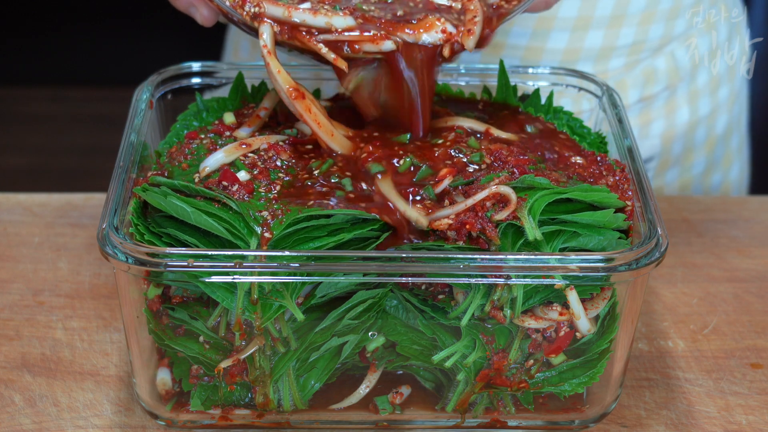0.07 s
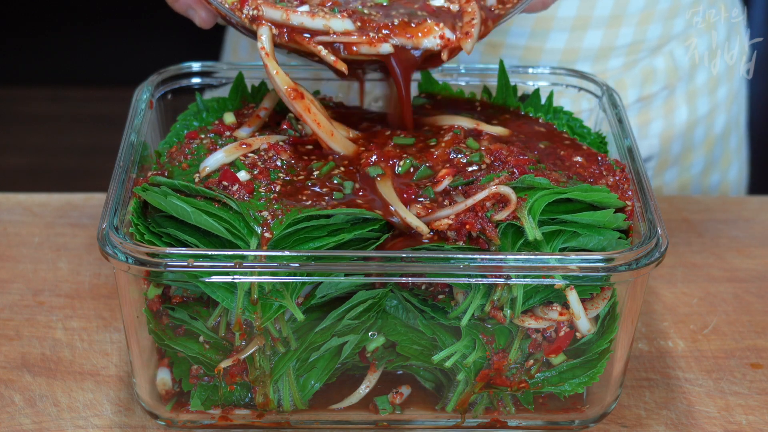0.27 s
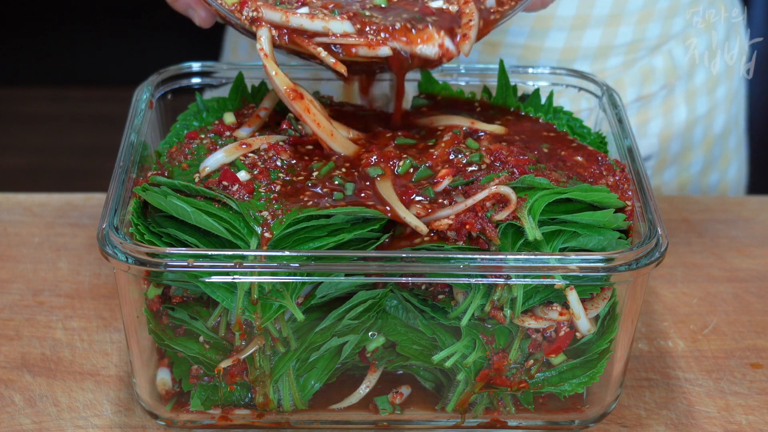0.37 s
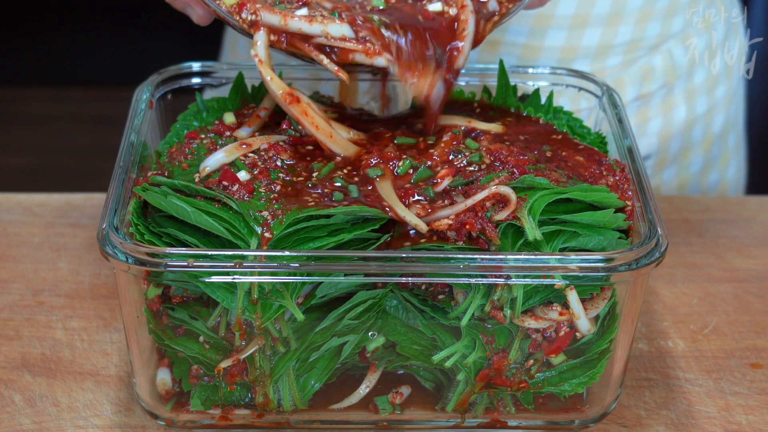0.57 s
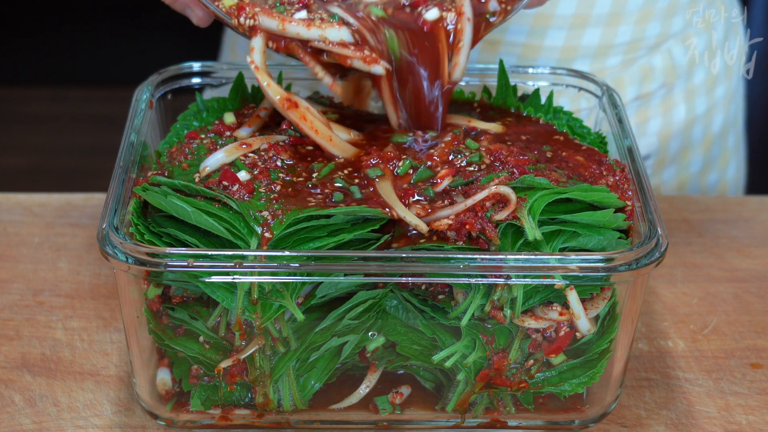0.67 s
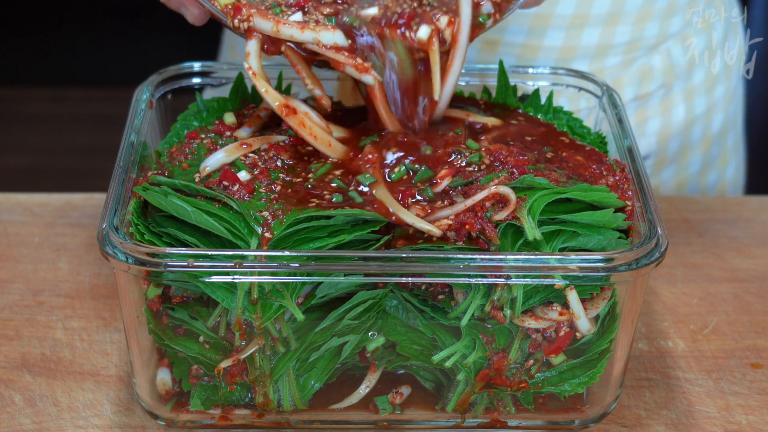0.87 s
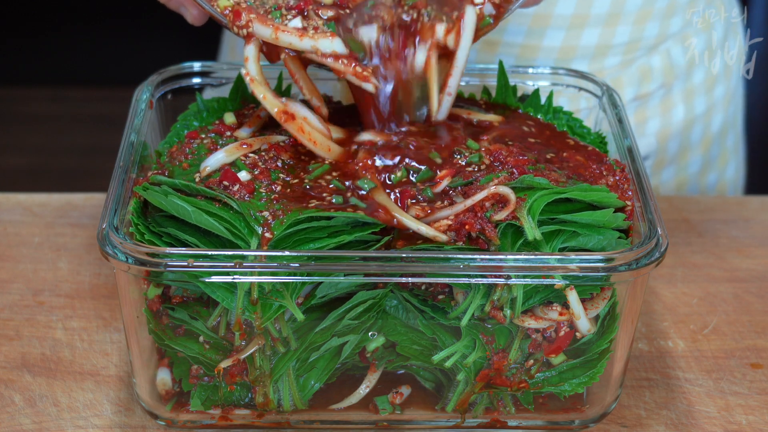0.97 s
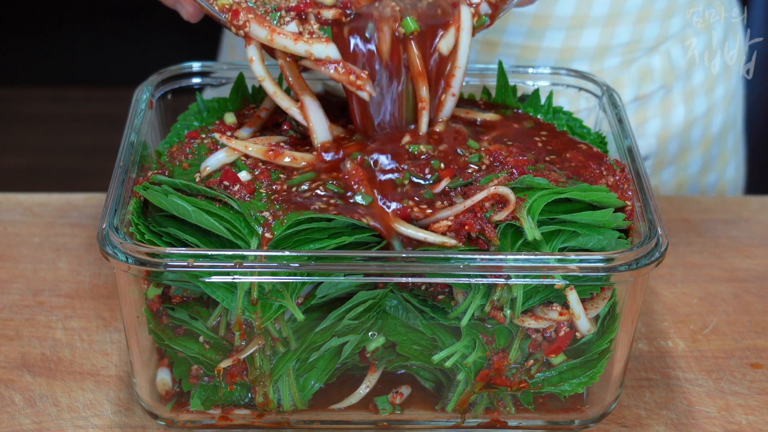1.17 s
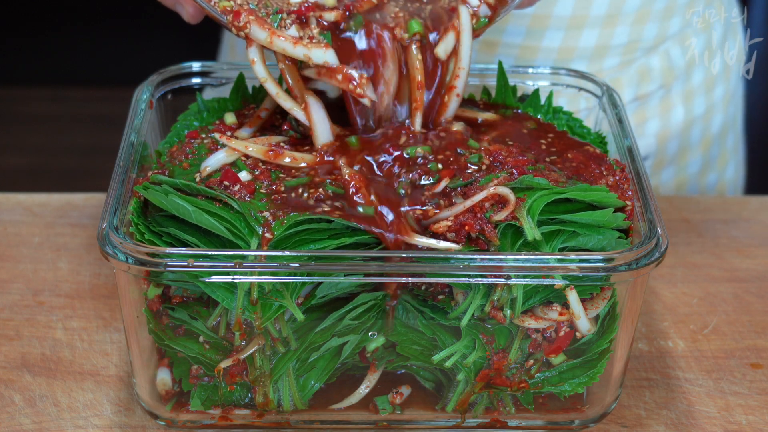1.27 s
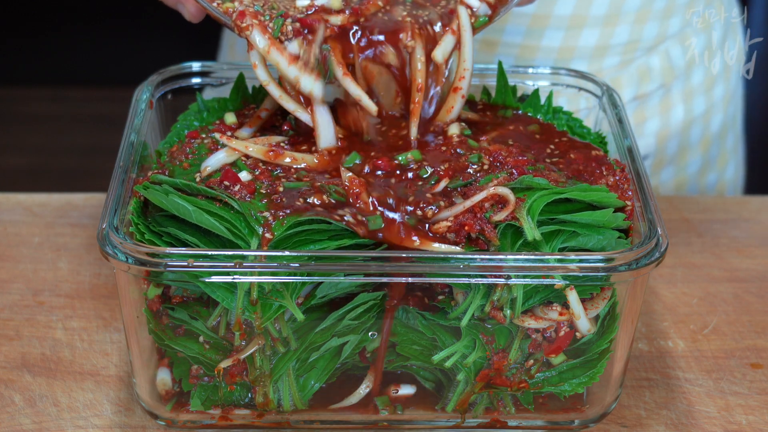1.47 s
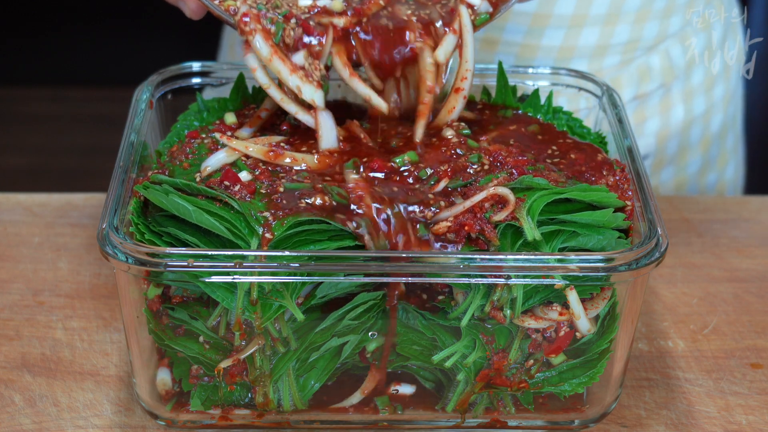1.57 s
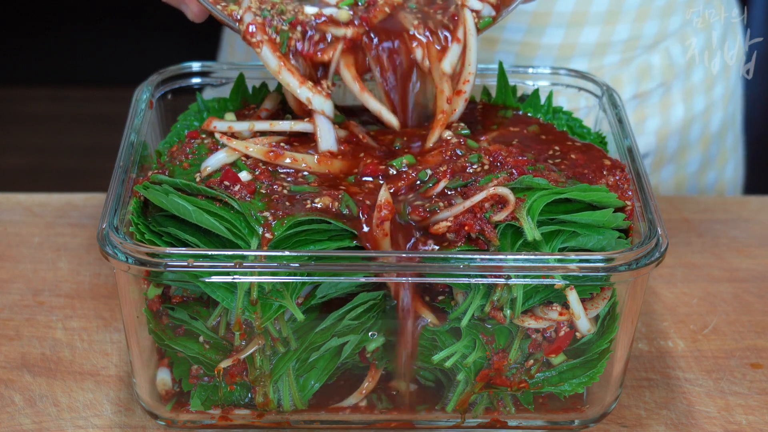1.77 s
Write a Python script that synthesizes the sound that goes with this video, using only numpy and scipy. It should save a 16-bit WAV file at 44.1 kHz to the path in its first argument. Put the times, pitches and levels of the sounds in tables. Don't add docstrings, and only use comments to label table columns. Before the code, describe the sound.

Soft wet sauce murmur and tiny ticks, a loud hollow thump on a wooden board near the start, a lull, then a crisp wet pop and gooey dribbles, over low motor hum and microphone hiss in a live kitchen.

```python
import sys
import numpy as np
from scipy import signal
from scipy.io import wavfile
from scipy.ndimage import uniform_filter1d

SR = 44100
rng = np.random.default_rng(int(sys.argv[2]) if len(sys.argv) > 2 else 0)


def volts_from_db(level):
    exponent = np.asarray(level, float) / 20
    return 10 ** exponent


def waveform_to_disk(signal):
    frames = np.transpose(np.atleast_2d(signal))
    scaled = np.clip(frames, -1, 1) * 32767
    samples = np.round(scaled).astype(np.int16)
    wavfile.write(sys.argv[1], SR, samples)


N = 79380
EDGE_HZ = 15850


def evened(x):
    return x / np.sqrt(np.mean(x ** 2) + 1e-20)


def read(points, hz, axis=1):
    columns = np.transpose(points)
    return np.interp(np.log(hz + 1), np.log(columns[0] + 1), columns[axis])


def add(mix, start_s, sound):
    part = mix[round(start_s * SR):][:len(sound)]
    part += sound[:len(part)]


def band(x, low_hz, high_hz):
    edges_hz = [low_hz, min(high_hz, SR / 2 - 2000)]
    sos = signal.butter(N=3, Wn=edges_hz, btype="band", fs=SR, output="sos")
    return signal.sosfilt(sos, x)


def ring(db, hz, t60_s, rise_s):
    t = np.arange(int(t60_s * SR) + 64) / SR
    decay = volts_from_db(db - 60 * t / t60_s)
    onset = (1 - np.exp(-t / rise_s)) ** 2
    return decay * onset * np.sin(2 * np.pi * hz * t)


# frequency in Hz, level in dB per Hz.
FLOOR_SPECTRUM = [(15, -56), (25, -31), (64, -9.5), (236, -8), (326, -3.5), (575, -11), (677, -9.5),
                  (1440, -27), (16000, -36)]
# frequency in Hz, lift in dB per Hz over the floor spectrum.
HISS_LIFT = [(2500, 0), (3500, -3), (6500, -2.5), (8500, -0.5), (11000, 3.5), (12500, 1.5), (14000, 5),
             (15800, 4.5)]
# centre in Hz, width in Hz, height in dB over the floor.
HUM_PEAKS = [(97.2, 46, 11), (185.2, 19, 11), (279, 11, 6), (308.5, 120, 1), (756, 30, -9),
             (2096, 66, 11.5), (4130, 56, 14.5), (5770, 340, 6), (6750, 110, 3.5), (4800, 320, 4)]


def background():
    level_db, patch_db = -51.5, 2.04
    hz = np.fft.rfftfreq(2048, 1 / SR)
    real, imaginary, patches = rng.standard_normal((N // 512 + 5, 1025, 3)).T
    patches = uniform_filter1d(patches, size=14, axis=0)
    patches = evened(uniform_filter1d(patches, size=8, axis=1))
    shape_db = read(FLOOR_SPECTRUM, hz) + read(HISS_LIFT, hz) - 60 * (hz > EDGE_HZ)
    for centre_hz, width_hz, peak_db in HUM_PEAKS:
        shape_db += peak_db / (1 + (2 * (hz - centre_hz) / width_hz) ** 2)
    drift_db = patch_db * patches * np.exp(-hz / 2500)[:, None]
    spectra = (real + 1j * imaginary) * volts_from_db(shape_db[:, None] + drift_db)
    noise = signal.istft(spectra, nperseg=2048, noverlap=1536)[1][:N]
    return volts_from_db(level_db) * evened(noise)


# pitch in Hz, level in dB rms.
MOTOR_TONES = [(209.9, -65.5), (317.6, -62), (678.3, -63.5), (753.7, -66)]


def motor():
    waver_db, waver_hz = 2, 2.07
    drift = rng.standard_normal((2 * len(MOTOR_TONES), N))
    drift = uniform_filter1d(uniform_filter1d(drift, size=3000), size=3000)
    drift = drift / drift.std()
    out = np.zeros(N)
    for k, (hz, db) in enumerate(MOTOR_TONES):
        level = np.sqrt(2) * volts_from_db(db + waver_db * drift[2 * k])
        phase = 2 * np.pi * np.cumsum(hz + waver_hz * drift[2 * k + 1]) / SR
        out += level * np.sin(phase)
    return out


# time in seconds, flow in dB.
SAUCE_FLOW = [(0, -7.5), (.7, -22), (.85, -36), (1, -34), (1.12, -2), (1.2, 2), (1.32, -9.5), (1.42, -3.5),
              (1.55, -24), (1.652, -7.5), (1.8, -39)]


def flow():
    level_db, bubbles_per_s, low_hz, high_hz = -57.5, 1500, 712, 4000
    size_db = 3.0 * np.minimum(rng.exponential(1, N), 5)
    bursts = volts_from_db(size_db) * (rng.random(N) < bubbles_per_s / SR)
    pitch = rng.integers(0, 24, N)
    out = np.zeros(N)
    for k, hz in enumerate(np.geomspace(low_hz, high_hz, num=24)):
        bubble = ring(-3.0 * np.log2(hz / low_hz), hz, 13.3 / hz, 0.76 / hz)
        out += signal.oaconvolve(bursts * (pitch == k), bubble)[:N]
    flow_db = np.interp(np.arange(N) / SR, *np.transpose(SAUCE_FLOW))
    return volts_from_db(level_db + flow_db) * evened(out)


# start in seconds, peak in dB, pitch in Hz, t60 in seconds.
WET_POPS = [(.1078, -45.5, 11870, 0.016), (.1078, -56, 8530, 0.019), (0.108, -56, 4000, 0.026),
            (.114, -44, 2163, 0.025), (0.1512, -28, 9570, 0.0087), (.1502, -31.5, 9900, 0.0074),
            (.1502, -35.5, 8280, 0.0055), (0.585, -54, 2960, 0.015), (1.056, -41.5, 5070, 0.0055),
            (1.0665, -41, 1493, 0.026), (1.1086, -46.5, 8460, 0.018), (1.1178, -17, 2600, 0.0076),
            (1.1176, -32.5, 1490, 0.011), (1.119, -32, 2905, 0.013), (1.162, -42, 1220, 0.04),
            (1.214, -49.5, 1197, 0.11), (1.347, -52, 3980, 0.022), (1.3484, -49, 2600, .01),
            (1.384, -34, 3060, 0.0075), (1.385, -44, 3740, 0.0081), (1.388, -45, 1080, 0.014),
            (1.402, -34.5, 458.8, 0.085), (1.4165, -33.5, 453, 0.047), (1.4064, -46, 8000, .005),
            (1.406, -47, 4000, .008), (1.6038, -41, 1550, 0.034), (1.6105, -36, 4300, 0.0022),
            (1.653, -51.5, 1660, .025)]


def pops():
    rise_cycles = 1.57
    out = np.zeros(N)
    for start_s, db, hz, t60_s in WET_POPS:
        add(out, start_s, ring(db, hz, t60_s, rise_cycles / hz))
    return out


def tick(db, low_hz, high_hz):
    snap = band(1. * (np.arange(600) == 0), low_hz, high_hz)
    return -volts_from_db(db) * snap / abs(snap).max()


# start in seconds, peak in dB, low edge in Hz, high edge in Hz.
SNAPS = [(0.1093, -44, 3000, 10000), (.1078, -48, 12000, 15800), (.1503, -48, 7040, 13900),
         (.227, -38.5, 1940, 3130), (0.229, -48.5, 3650, 4200), (.227, -46, 4600, 7000),
         (1.1182, -28.5, 3460, 8400), (1.1184, -31.5, 12000, 16000), (1.1184, -40.5, 9350, 11000),
         (1.3467, -43, 1800, 7000), (1.3865, -49, 2500, 6200), (1.392, -48, 2370, 4240),
         (1.405, -42.5, 2300, 8600), (1.4062, -51, 11000, 15000), (1.633, -50, 5930, 9100)]


def ticks():
    out = np.zeros(N)
    for start_s, *snap in SNAPS:
        add(out, start_s, tick(*snap))
    return out


def spit(db, low_hz, high_hz, t60_s):
    t = np.arange(4000) / SR
    burst = volts_from_db(-60 * t / t60_s) * rng.standard_normal(len(t))
    burst = band(burst, low_hz, high_hz)
    return volts_from_db(db) * burst / abs(burst).max()


# pitch in Hz, level in dB, t60 in seconds, rise in seconds.
BOARD_MODES = [(63.4, -30, 0.45, 0.011), (133.2, -7.5, 0.38, 0.0088), (115, -22, 0.2, 0.004),
               (210.5, -16.5, 0.45, 0.047), (263, -30, 0.065, 0.006), (373, -6.5, 0.071, 0.0027),
               (441, -21.5, 0.27, 0.0025), (512, -11.5, 0.063, 0.0012), (634.2, 1.5, 0.092, 0.0054),
               (758, -4, 0.023, 0.00041), (950, -15, 0.032, 0.00031), (1119, -10.5, 0.048, 0.0017),
               (1316, -24.5, 0.055, 0.00067), (1900, -13, 0.017, 0.0016)]


def knock():
    start_s, level_db = .2266, -9.5
    out = np.zeros(N)
    rattle = spit(level_db - 11.5, low_hz=179, high_hz=1296, t60_s=0.043)
    add(out, start_s, rattle)
    for k, (hz, db, t60_s, rise_s) in enumerate(BOARD_MODES):
        sign = (-1) ** k
        add(out, start_s, sign * ring(level_db + db, hz, t60_s, rise_s))
    return out


# frequency in Hz, t60 in seconds, strength in dB for the near sauce,
# strength in dB for the farther knock.
KITCHEN_DECAY = [(130, .3, -11, -12), (294, .5, -5, 1.5), (630, 0.79, 3.5, -3), (1550, 0.58, -13, 3.5),
                 (2600, 0.66, -6.5, 1), (4000, 0.74, -1.5, 4), (10000, 0.48, 0.5, -3.5),
                 (15000, 0.46, 4.5, 3.5)]
# delay in seconds, level in dB, low edge in Hz, high edge in Hz.
WALL_ECHOES = [(.0058, -7, 4500, 17000), (.0088, -12, 2000, 17000), (.016, -11, 7000, 16000),
               (.0225, -22, 300, 9000), (.0405, -11, 2200, 5500)]


def kitchen(x, axis):
    tail_db = -3.5
    taps = np.zeros(SR)
    at = np.arange(240, SR - 20, 20)
    taps[at + rng.integers(0, 20, len(at))] = rng.choice([-1., 1.], len(at))
    hz, t, spectra = signal.stft(taps, SR, nperseg=256)
    strength_db = read(KITCHEN_DECAY, hz, axis=axis) - 60 * (hz > EDGE_HZ)
    decay_db = -60 * t / read(KITCHEN_DECAY, hz)[:, None]
    tail = signal.istft(spectra * volts_from_db(strength_db[:, None] + decay_db), SR, nperseg=256)[1]
    tail = volts_from_db(tail_db) * tail / np.linalg.norm(tail)
    for delay_s, db, *edges_hz in WALL_ECHOES:
        add(tail, delay_s, band(volts_from_db(db) * (np.arange(400) == 0), *edges_hz))
    return signal.fftconvolve(x, tail)[:N]


def scene():
    steady = background() + motor()
    wet = flow() + pops() + ticks()
    blow = knock()
    wet_room = kitchen(wet, axis=2)
    blow_room = volts_from_db(-5) * kitchen(blow, axis=3)
    return (wet + blow + wet_room + blow_room + steady)[None]


def roll_off(x):
    return signal.sosfilt(signal.butter(12, 16990, fs=SR, output="sos"), x)


def record(dry):
    return roll_off(dry)


dry = scene()
out = record(dry)
waveform_to_disk(out)
```